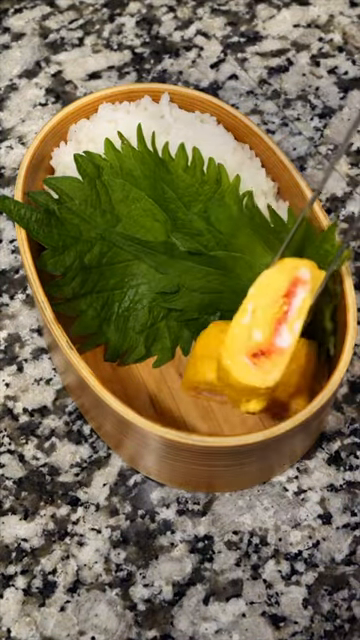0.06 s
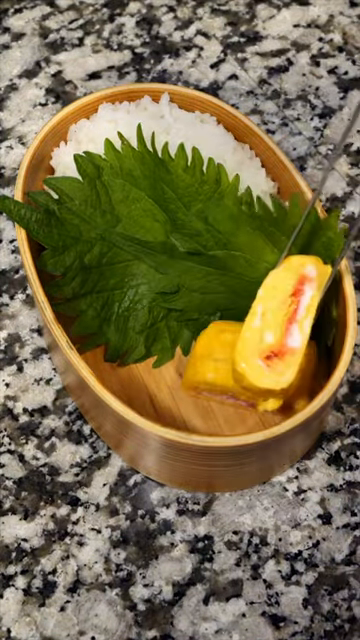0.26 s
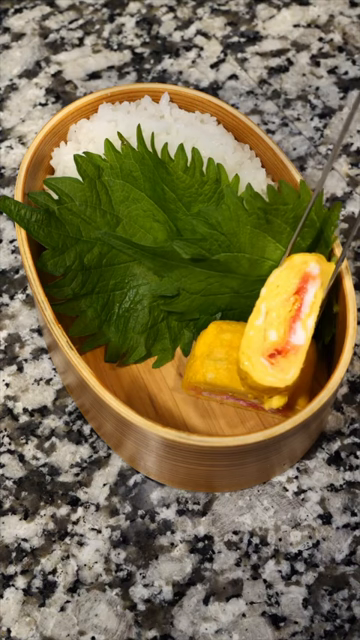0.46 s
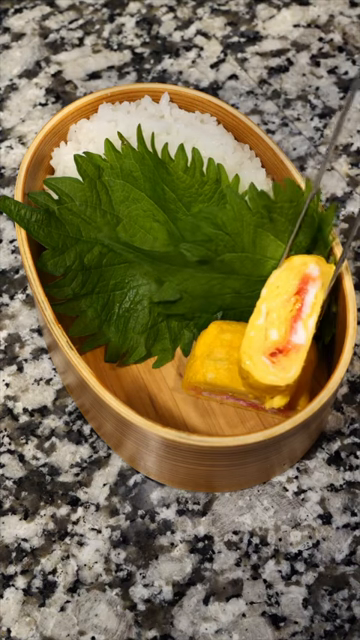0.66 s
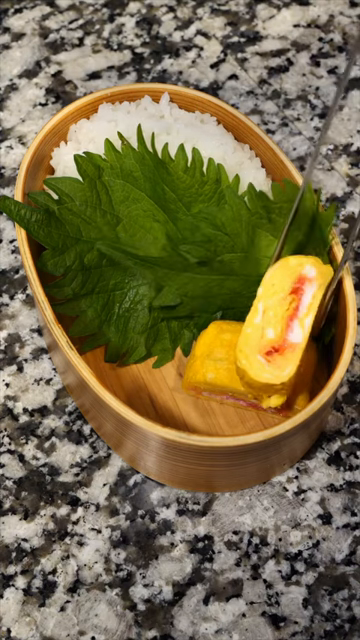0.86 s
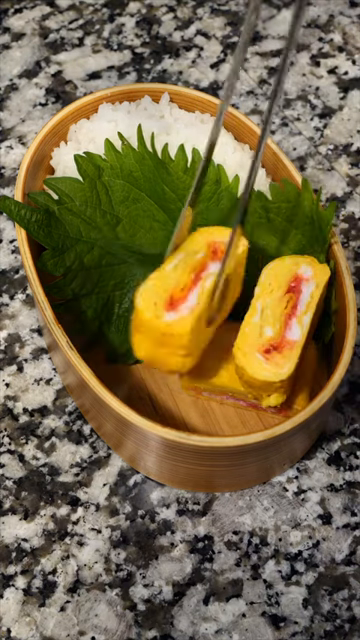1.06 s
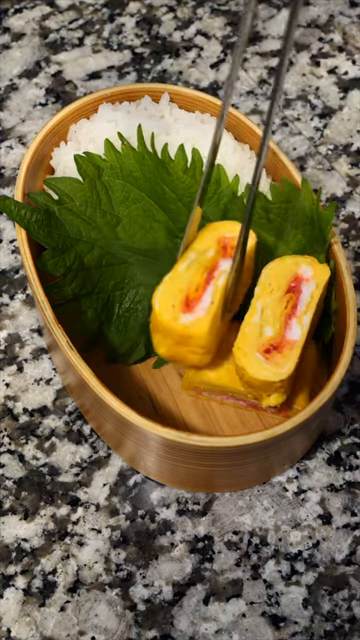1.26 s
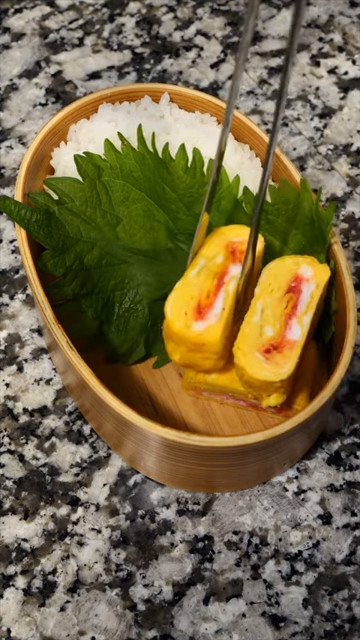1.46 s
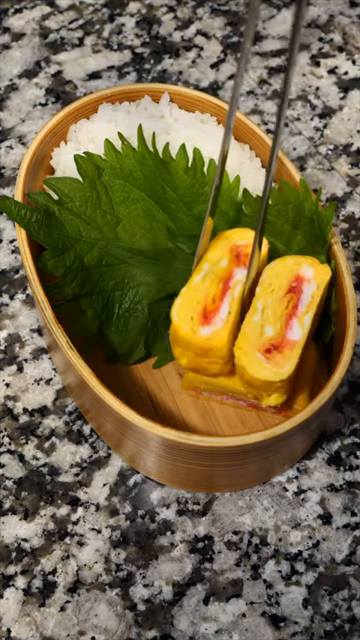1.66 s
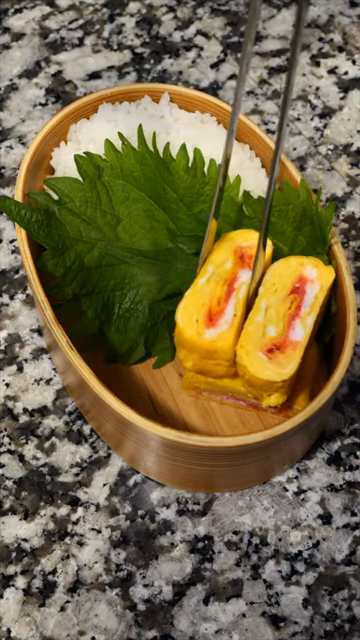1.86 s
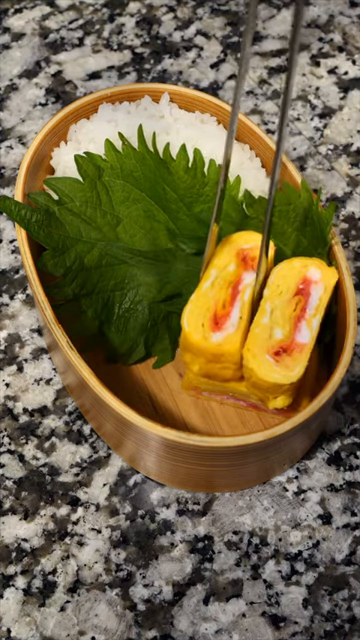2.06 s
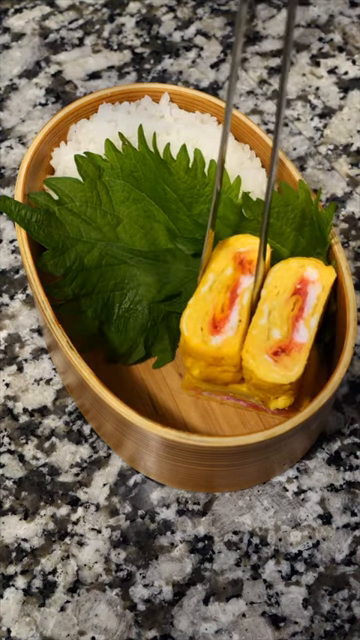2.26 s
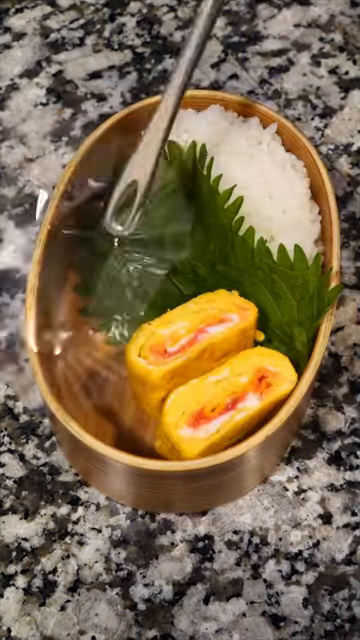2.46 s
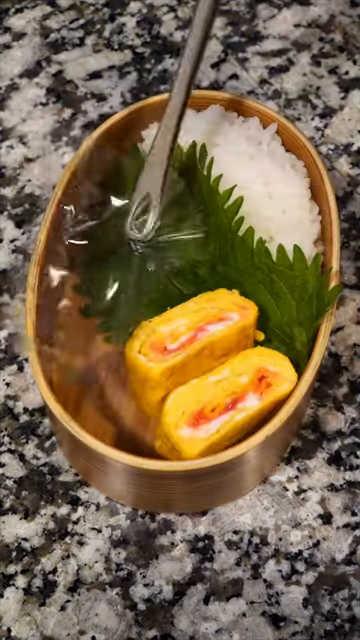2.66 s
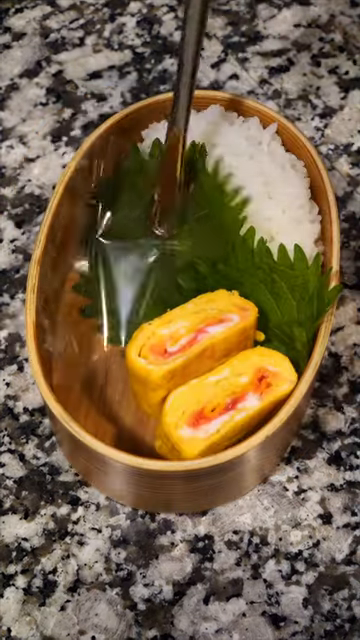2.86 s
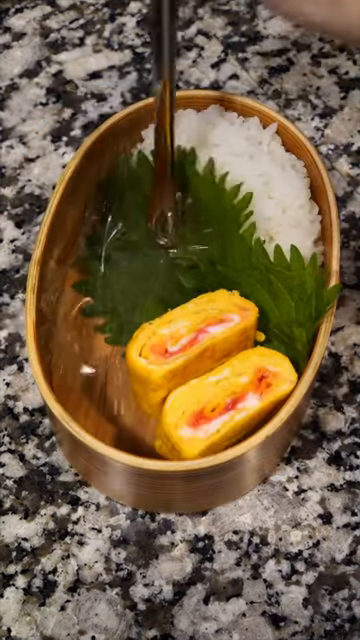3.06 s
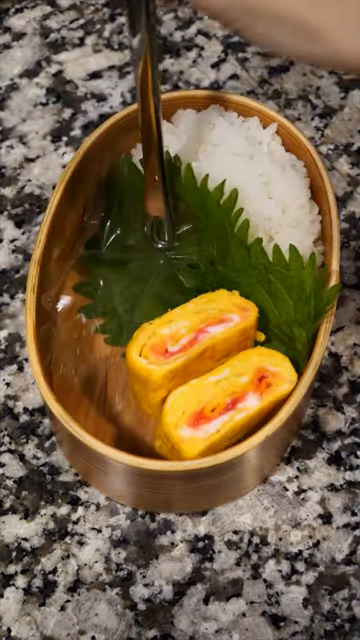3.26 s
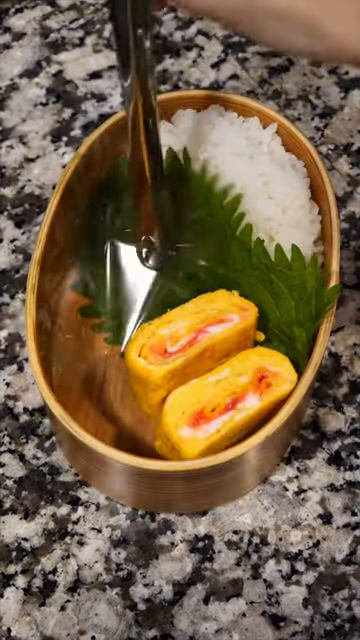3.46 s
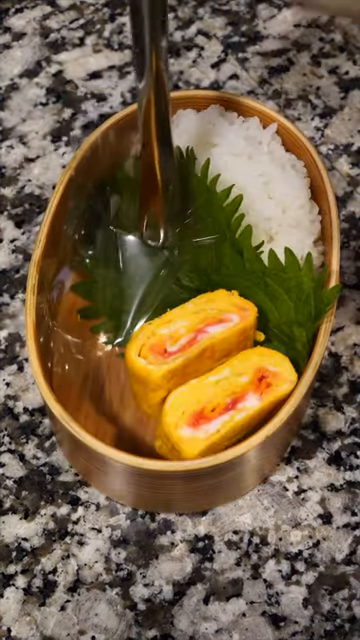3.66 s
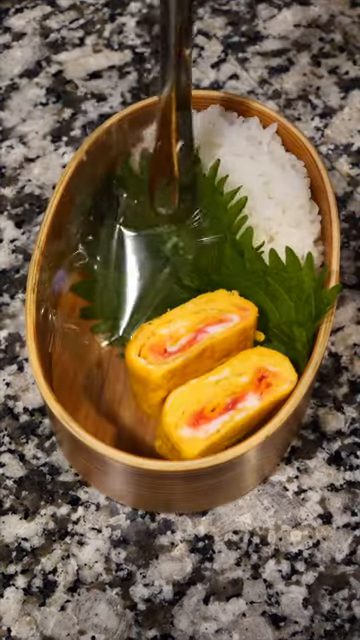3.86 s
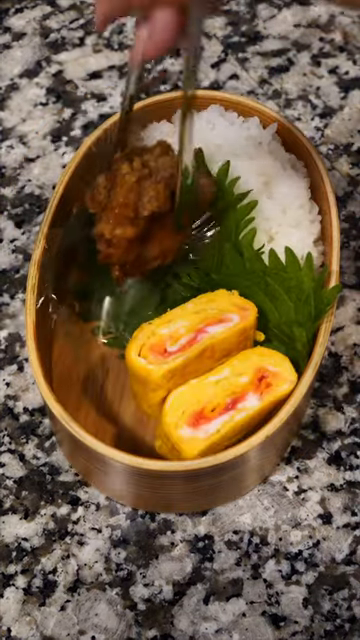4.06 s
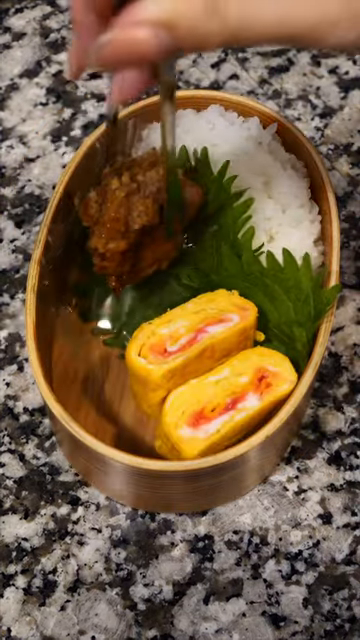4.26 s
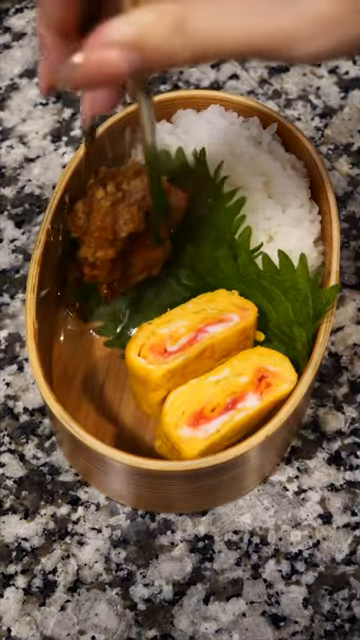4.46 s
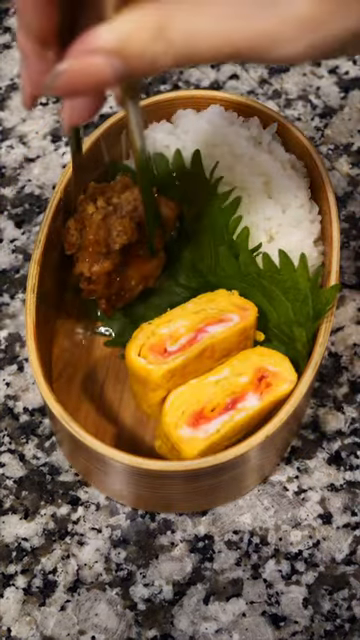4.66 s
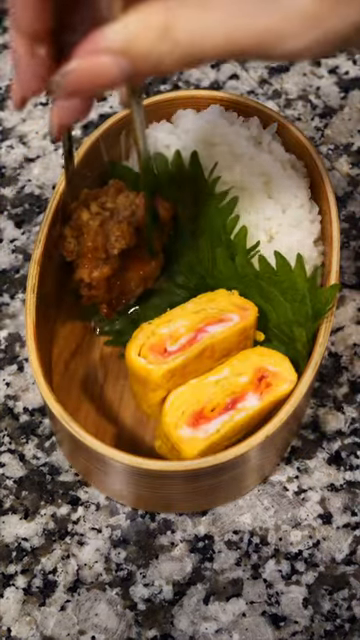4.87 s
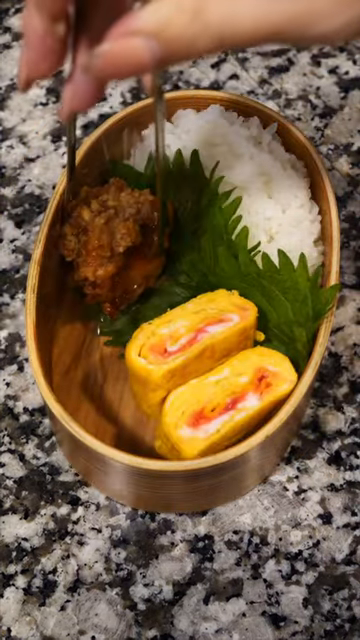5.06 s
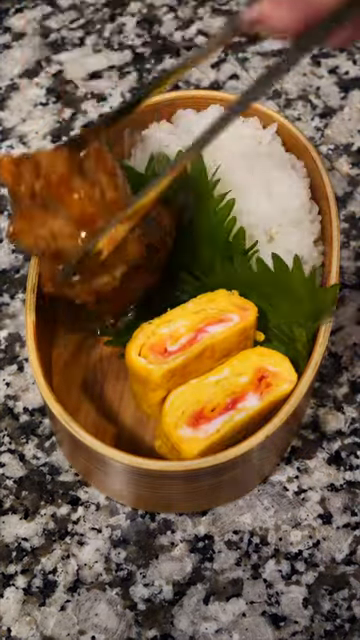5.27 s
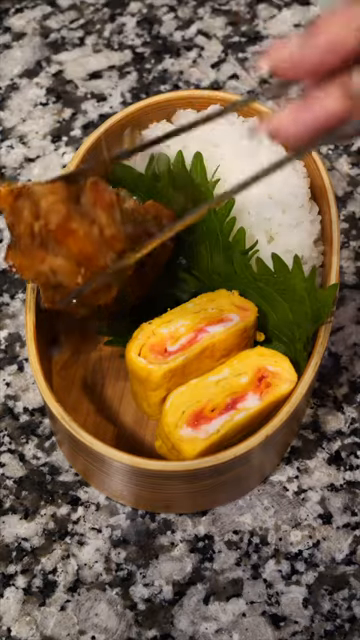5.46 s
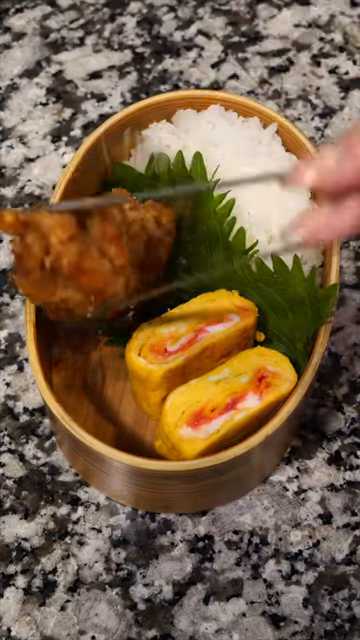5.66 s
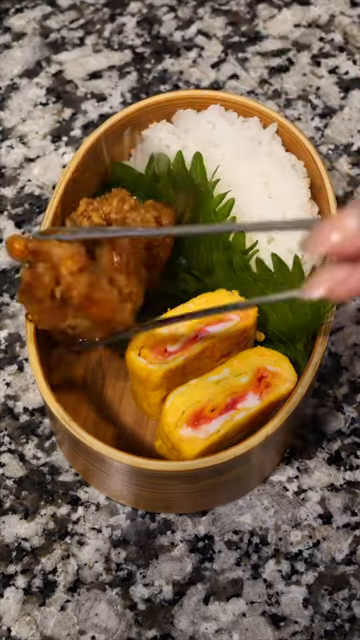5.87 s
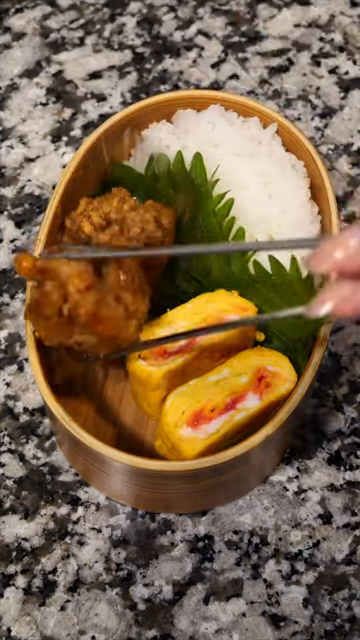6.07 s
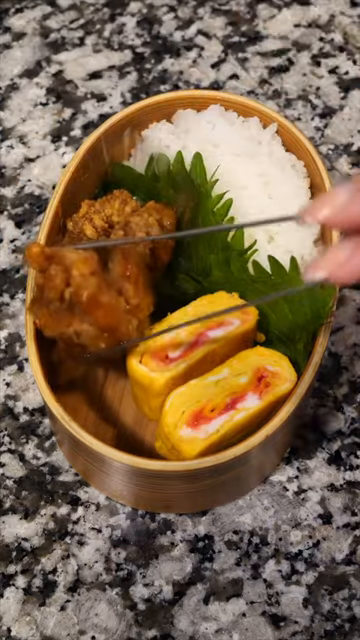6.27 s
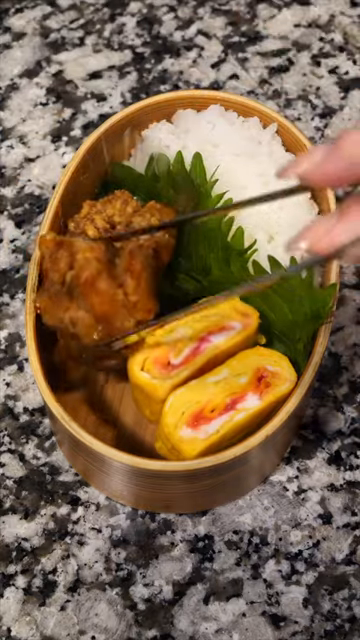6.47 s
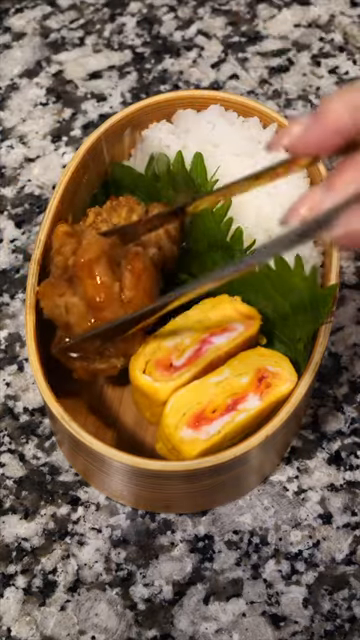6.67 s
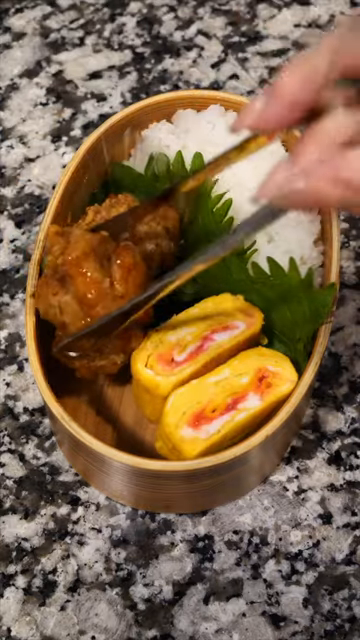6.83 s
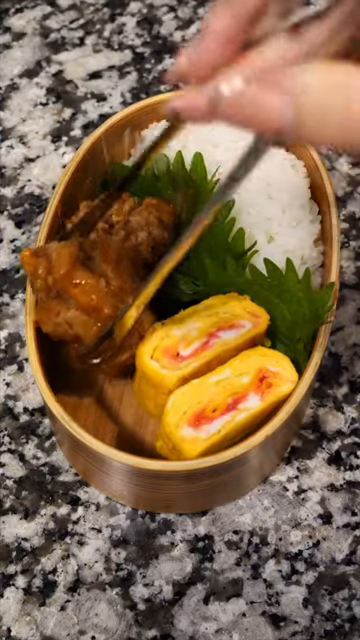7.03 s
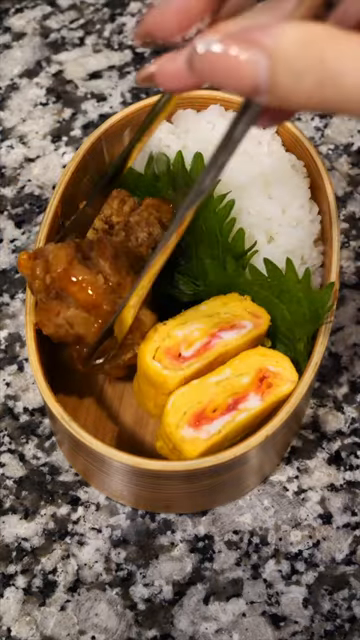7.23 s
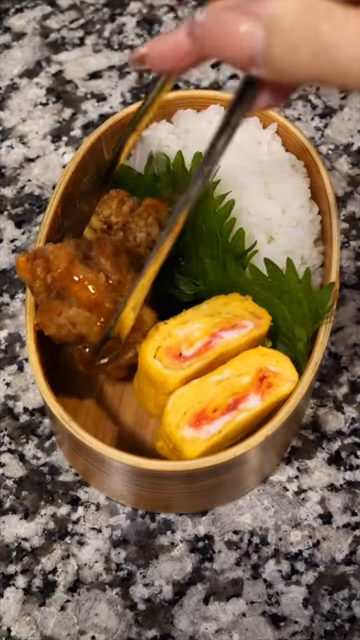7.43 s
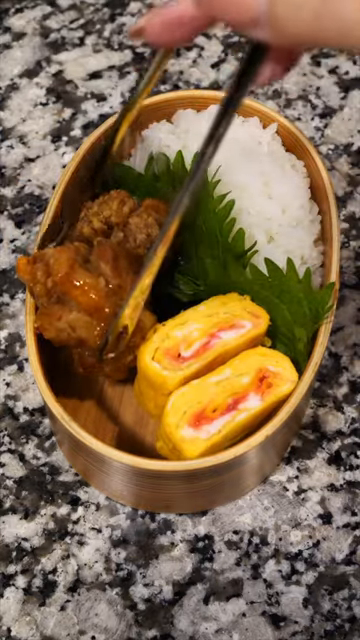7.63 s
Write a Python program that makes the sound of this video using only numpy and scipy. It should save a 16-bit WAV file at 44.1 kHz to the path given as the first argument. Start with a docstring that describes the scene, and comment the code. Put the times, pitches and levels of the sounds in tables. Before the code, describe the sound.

Thin stiff plastic snaps and crackles sharply inside a wooden lunch box, then light metal tong taps, over faint room air and appliance hum.

```python
"""Room air (shaped noise) and an appliance's hum (noise through narrow resonances) run throughout.
From 0.9 s a stiff, thin plastic cup snaps softly in a wooden lunch box: delayed pulses through resonances.
From 2.6 s it is squeezed: hard snaps, crackle made of random ticks, and dying sine pings of its panels.
The box floor rings low under it from the start, the wall is knocked at 4.8 s and slim tongs tap at 5.1 s.
A cut leaves only air and hum from 5.3 to 6 s; snaps and taps return until 7.1 s, in a small hard kitchen."""
import sys
import numpy as np
from scipy import signal
from scipy.fft import irfft
from scipy.io import wavfile
from scipy.ndimage import uniform_filter1d

SR = 44100
rng = np.random.default_rng(int(sys.argv[2]) if len(sys.argv) > 2 else 0)


def to_wav(s):
    """Save 16-bit WAV."""
    ch = np.atleast_2d(s).T  # columns
    pcm = np.round(np.clip(ch, -1, 1) * 32767)  # PCM
    wavfile.write(sys.argv[1], SR, pcm.astype(np.int16))


N = 339570


def gain_of(db):
    """Decibels to gain."""
    return 10 ** (np.asarray(db) / 20)


def evened(x):
    """Scales to rms 1."""
    return x / np.sqrt(np.mean(x ** 2) + 1e-20)


def read(points, hz):
    """Reads a table over log frequency."""
    f, value = np.transpose(points)
    return np.interp(np.log(hz + 1), np.log(f + 1), value)


def add(mix, s, sound):
    """Mixes a sound in at a time in seconds."""
    part = mix[round(s * SR):][:len(sound)]
    part += sound[:len(part)]


def noise_pair(shape, side_db, size):
    """Left and right from random short-time spectra: a shared middle plus an unrelated, weaker side."""
    a, b, c, d = rng.standard_normal((shape.shape[1], shape.shape[0], 4)).T
    hz = np.fft.rfftfreq(size, 1 / SR)
    mid = a + 1j * b
    side = gain_of(read(side_db, hz))[:, None] * (c + 1j * d)
    spectra = np.array([mid + side, mid - side]) * shape
    return signal.istft(spectra, nperseg=size, noverlap=size * 3 // 4)[1]


def air():
    """Steady noise of the room, with faint drifting patches in its spectrum."""
    # colour of the air: (frequency [Hz], relative level per Hz [dB])
    air_colour = [(25, -59.5), (65, -38), (102, -11.5), (251, -3.5), (357, -4), (387, -9), (420, -7),
                  (722, -9), (922, -17), (1500, -16), (1820, -22), (2600, -28), (9500, -34.5),
                  (15100, -42.5), (16400, -52)]
    # stereo width: (frequency [Hz], side against mid [dB])
    air_width = [(60, -39.5), (150, -58), (380, -22.5), (950, -9.5), (2380, -4.5), (5980, -12.5),
                 (15000, -37)]
    level_db = -49
    hz = np.fft.rfftfreq(2048, 1 / SR)
    patches = rng.standard_normal((N // 512 + 5, len(hz))).T
    patches = uniform_filter1d(patches, 20, 0)  # smooth over frequency
    patches = evened(uniform_filter1d(patches, 8, 1))  # and over time
    shape = gain_of(read(air_colour, hz)[:, None] + 0.66 * patches)
    noise = noise_pair(shape, air_width, size=2048)[:, :N]
    return gain_of(level_db) * evened(noise)


def resonate(x, hz, width):
    """A resonance of gain 1, applied twice for steep skirts."""
    pole = np.exp((2j * np.pi * min(hz, SR * .45) - np.pi * width) / SR)
    rung = 2 * signal.lfilter([(1 - abs(pole)) ** 2], [1, -2 * pole, pole ** 2], x).real
    # a small object sends out little bass
    return np.diff(rung, prepend=0) / abs(2 * np.sin(np.angle(pole) / 2))


def hum():
    """Fuzzy tones of a running appliance: noise through resonances."""
    # hum tones: (frequency [Hz], width [Hz], level [dB])
    hum_tones = [(262, 13, -57.5), (390.7, 16, -57.5), (590.3, 13, -60), (1111, 82, -65.5)]
    out = np.zeros(N)
    for hz, width, db in hum_tones:
        out += gain_of(db) * evened(resonate(rng.standard_normal(N), hz, width))
    return out


def through_cup(x, shares_db, tuning):
    """Sum of the cup's resonances, neighbours in opposite phase."""
    # broad resonances of cup and box, low to high: (frequency before tuning [Hz], width [Hz], relative level [dB])
    cup_modes = [(1076, 1230, 17), (1750, 1800, 18), (2510, 1950, 13.5), (4680, 2500, 13), (8000, 4750, 3),
                 (14200, 1500, 7)]
    out = 0
    for k, ((hz, width, db), share) in enumerate(zip(cup_modes, shares_db)):
        out = out + (-1) ** k * gain_of(db + share) * resonate(x, hz * tuning, width)
    return out


def snaps():
    """A crease flips; bending waves bring each pitch to the air at its own delay. Gives direct and room feed."""
    # snaps: (time [s], strength [dB], body [dB], crack [dB], sizzle [dB], tuning of the bent cup [factor],
    # relative spread [ms]); body sets the three low resonances, crack the fourth, sizzle the highest,
    # all against the fifth
    snap_events = [(0.8859, -28.5, 5.5, 0.5, 0, 0.9, 0.6), (1.057, -39, 0, -8, 4, 0.85, 1.7),
                   (1.267, -34.5, -1, -11, -15, 0.81, 2.8), (1.6347, -33, -13, -20, -15, 1.05, .8),
                   (2.5552, -6.5, 1.5, -1.5, -11, 0.63, 0.64), (2.5837, -20, -1, -11, -17, 0.99, 1.1),
                   (2.637, 3.5, -12, -15, -27, 0.89, 0.55), (2.662, -28.5, 8, 2, -22, 0.76, 1.8),
                   (2.7366, -17, -2, -15, -9, 0.72, 2.7), (2.762, -10.5, -6, -27, 2.5, 0.81, 1.46),
                   (2.773, -10.5, 2.5, -1.5, -8, 1.05, 1.4), (2.79, -11, 0.5, -8.5, -9, 0.98, 0.66),
                   (2.832, -27, 8.5, 6.5, -20, 1.22, 3.3), (3.1661, 10, -16, -11.5, -10.5, 0.91, 0.32),
                   (3.3493, 0, -13.5, -17.5, -26.5, 1.09, 0.73), (3.409, -13, -9.5, -14, -20, 0.74, 1.34),
                   (3.4133, -14.5, -7, -14, -6.5, 1, 0.86), (3.421, -7.5, -5, -9.5, -1, 0.67, 1.16),
                   (3.4244, 9, -13.5, -4.5, -2.5, 1.24, 1.08), (3.5442, -24.5, -1.5, -11.5, -22, 1, 1.03),
                   (3.6732, 9, -9.5, -4, -12, 1.15, 1.6), (4.1102, -32.5, 2, -3, -16, 1.02, 1.66),
                   (4.156, -30.5, 1, -7, -8, 0.94, 1.1), (4.2411, -12.5, -10, -12, -9, 0.99, 2.04),
                   (4.26, 4.5, -12, -14.5, -17, 0.93, 0.76), (4.333, -28, -1, -8, -8, 1.04, 0.96),
                   (4.4175, -3, -7, -10.5, -12.5, 0.87, 0.89), (4.446, -23, -8, -10.5, -16.5, 0.59, 0.77),
                   (4.455, -16, -4, -5, -8, 0.79, 0.4), (4.469, 1.5, -14.5, -15, -37.5, 0.89, 0.59),
                   (4.511, -14.5, -18, -13, -18, 0.93, 0.31), (4.5573, -30.5, 0.5, -15, -21, 0.89, 0.25),
                   (4.577, -22, -19, 0, -6, 1, 0.3), (4.585, -22.5, -14, -1, -8, 1.24, 0.56),
                   (4.6077, -35, 7, -7, -12, 0.77, 0.76), (4.626, -14, -5, -1, -13, 0.99, 0.76),
                   (4.721, -4, -4, -5.5, -11, 0.91, 1.27), (4.7352, -14.5, -5, 1, 8.5, 0.66, 0.83),
                   (4.7538, 9, -12, -10.5, -1, 0.94, 1.51), (4.812, -11, -10, -0.5, -10, 1.2, 0.51),
                   (4.938, -18, -10.5, -16, -24, 0.93, 0.78), (4.9642, -34, 4, 3, -9, 0.77, 0.81),
                   (5.0817, -9.5, -12.5, -7.5, -9, 1.15, 0.52), (5.1173, -15.5, -11, -9, -14, 0.84, 0.56),
                   (5.2897, -24.5, -1, -6, 0.5, 0.7, 0.69), (5.3002, -35.5, 9, -15, -12, 0.61, 0.63),
                   (6.0855, -12, -6, -6.5, -29, 0.99, 0.85), (6.245, -25.5, -9, -13, -13.5, 0.92, 1.4),
                   (6.437, -39.5, 7, 14.5, 7, 0.83, 0.57), (6.464, 3, -12.5, -24, -16, 1, 0.56),
                   (6.6362, -12, -8, -7.5, -34, 0.94, 0.44), (6.774, -9.5, -13, -17, -9, 1.2, 1.2),
                   (6.7796, -7.5, -16, -18, 6, 0.87, 0.6), (6.82, -4.5, -14.5, -19, -21, 0.77, 0.53),
                   (7.009, -26.5, -4, -2.5, -21, 1.43, 0.83), (7.0523, -24.5, 0.5, -3, 3, 0.7, 0.99),
                   (7.0844, -9.5, -12.5, -7.5, -13, 1.06, 0.86)]
    # how the three low resonances follow the body: (level at body 0 [dB], slope [dB per dB of body])
    body_follow = [(-2.5, 1.3536), (1.5, 1.4333), (5.5, 1.2847)]
    # tight snaps face the microphone, spread ones reach it more by the room
    room_db, room_db_per_ms = -5, 3.5
    direct, thrown = np.zeros(N), np.zeros(N)

    chance = rng.standard_normal((len(snap_events), 513))
    chance = uniform_filter1d(chance, size=30, axis=1)  # smooth over frequency
    spread_s = np.array(snap_events)[:, -1:].clip(0, 4) / 1000
    delays_s = 0.000308 + spread_s * 0.7 * evened(chance) ** 2
    ripple = gain_of(2.1 * evened(chance[:, ::-1]))  # no two creases have quite the same colour
    phase = 2 * np.pi * np.cumsum(delays_s, axis=1) * SR / 1024  # delays summed over frequency
    pulses = irfft(ripple * np.exp(-1j * phase), axis=1)[:, :700]

    for (s, db, body_db, crack_db, sizzle_db, tuning, ms), pulse in zip(snap_events, pulses):
        low_db = [rest_db + slope * body_db for rest_db, slope in body_follow]
        shares_db = low_db + [crack_db, 0, sizzle_db]
        snap = gain_of(db) * through_cup(pulse, shares_db, tuning)
        # a weaker repeat about 1 to 2 ms later, gap drawn at random, combs the colour
        gap = round(SR / rng.uniform(500, 1100))
        add(direct, s, snap + 0.35 * np.roll(snap, gap))
        add(thrown, s, gain_of(room_db + room_db_per_ms * min(ms, 2)) * snap)
    return direct, thrown


def rings(blows, modes):
    """A blow sets close modes ringing; they beat against each other as they die."""
    free_db, free_octaves = 7, 0.25  # how much, and how widely, modes near a free pitch stand out
    out, t = np.zeros(N), np.arange(SR // 4) / SR
    phases = 2 * np.pi * rng.random((len(blows), len(modes)))
    for (s, db, *free_hz), phase in zip(blows, phases):
        ring = np.zeros(len(t))
        for (hz, mode_db, t60), p in zip(modes, phase):
            lift_db = sum(free_db * np.exp(-(np.log2(hz / f) / free_octaves) ** 2) for f in free_hz)
            dying = gain_of(mode_db + lift_db - 60 * t / t60)
            ring += dying * np.sin(2 * np.pi * hz * t + p)
        add(out, s, gain_of(db) * ring * np.minimum(t / 0.00067, 1))  # short rise in s
    return out


def floor_pushes():
    """The cup is pushed against the box floor, which rings low."""
    # pushes: (time [s], level [dB])
    push_events = [(0.887, -45), (2.557, -29.5), (2.775, -29.5), (2.79, -28), (2.835, -33.5),
                   (3.167, -43.5), (4.261, -36.5), (4.722, -35), (6.087, -43.5), (6.466, -40.5)]
    # floor modes: (frequency [Hz], relative level [dB], time to die by 60 dB [s])
    floor_modes = [(686, -16, .05), (853, -2, 0.045), (987, -6.5, 0.061), (1290, -0.5, 0.076),
                   (2205, -6.5, 0.04)]
    return rings(push_events, floor_modes)


def pings():
    """A flat panel of the cup rings for a few cycles at its own pitch."""
    # pings: (time [s], level [dB], pitch [Hz])
    ping_events = [(0.887, -40, 2050), (2.9322, -17.5, 1900), (3.1663, -3.5, 7800), (3.1663, -16, 2000),
                   (3.3502, -9, 7820), (3.4239, -5, 8200), (3.428, -6.5, 2750), (3.6735, -13, 2050),
                   (3.674, -2, 10400), (3.676, -12, 7000), (4.385, -24, 2300), (4.4695, -6.5, 7600),
                   (4.7553, -2.5, 4500)]
    cycles = 20  # until it has died by 60 dB
    out, t = np.zeros(N), np.arange(1000) / SR
    for s, db, hz in ping_events:
        dying = gain_of(db - 60 * t * hz / cycles)
        rise = np.minimum(t * hz / 1.2, 1)  # over 1.2 cycles
        add(out, s, dying * np.sin(2 * np.pi * hz * t) * rise)
    return out


def crumple():
    """Many small creases of uneven size give way at random; in a burst a fold slides over at once."""
    # crackle while the cup is bent, one curve per squeeze: (time [s], level [dB], brightness [dB])
    squeeze_curves = [
        [(2.66, -43, -29), (2.71, -57, -3), (2.768, -37.5, 1), (2.776, -41, 4), (2.82, -49, -13),
         (2.9, -40.5, -6), (3.14, -50.5, -3.5)],
        [(3.22, -66, -6.5), (3.312, -49.5, -5.5), (3.34, -59, -2)],
        [(3.5, -53, -7), (3.554, -40, -3), (3.61, -57, -3), (3.66, -45, 3)],
        [(4.3, -70.5, -2), (4.376, -70, 10), (4.382, -45, -7.5), (4.48, -59, -4), (4.566, -74.5, -3),
         (4.766, -45, 8.5), (4.86, -66, 6)],
        [(5.09, -69, 7.5), (5.17, -80, -5), (5.3, -57, -22)],
    ]
    # bursts: (time [s], level [dB], brightness [dB], length [ms])
    fold_bursts = [(2.921, -34, -3.5, 44), (4.381, -35.5, -7.5, 14.3), (4.604, -34, -1, 17),
                   (4.682, -33, -3, 24), (5.068, -35.5, -22, 14), (.9, -64, -9.5, 150)]
    t = np.arange(N) / SR
    sizes = gain_of(3.8 * np.minimum(rng.exponential(1, N), 3.5))
    happens = rng.random(N) < 450 / SR  # 450 ticks a second on average
    ticks = sizes * happens * rng.choice([-1, 1], N)
    dull = evened(through_cup(ticks, (-7.5, -1.0, 4, -11.5, -35.5, -28.0), 0.78))
    bright = evened(through_cup(ticks, (-28.5, -37.0, -23.5, -5.0, 1.5, -12.5), 1.0))
    out = np.zeros(N)
    for rows in squeeze_curves:
        s, db, bright_db = np.transpose(rows)
        on = uniform_filter1d(1. * (t > s[0]) * (t < s[-1]), 400)  # soft edges
        colour = dull + gain_of(np.interp(t, s, bright_db)) * bright
        out += on * gain_of(np.interp(t, s, db)) * colour
    for s, db, bright_db, ms in fold_bursts:
        u = np.clip((t - s) * 1000 / ms, 0, 1)
        swell = np.sin(np.pi * u ** .85).clip(0)
        out += gain_of(db) * swell * (dull + gain_of(bright_db) * bright)
    return out


def wall_knocks():
    """The box wall is knocked and rings."""
    # knocks: (time [s], level [dB])
    knock_events = [(4.812, -20), (4.821, -33)]
    # wall modes: (frequency [Hz], relative level [dB], time to die by 60 dB [s])
    wall_modes = [(1573, -4, 0.048), (1480, -3, 0.027)]
    return rings(knock_events, wall_modes)


def tong_taps():
    """The tongs tap the rim and ring, modes near the pitch that the grip leaves most free standing out."""
    # taps: (time [s], level [dB], free pitch [Hz])
    tap_events = [(5.1176, -35, 4700), (6.0876, -41.5, 6700), (6.2448, -48.5, 3700), (6.4641, -23.5, 3500),
                  (6.636, -42, 4200), (6.8206, -47, 5600), (7.0855, -29.5, 1660)]
    # tong modes: (frequency [Hz], relative level [dB], time to die by 60 dB [s])
    tong_modes = [(1265, -4, .022), (1540, -5, .025), (1850, -6, .018), (3050, -12, .018), (3595, -6, .022),
                  (3960, -6, .025), (4440, -10, .018), (4950, -10, .015), (5460, -7, .018),
                  (6040, -8, .025), (7700, -6, .012)]
    return rings(tap_events, tong_modes)


def hollowed(x):
    """Sound from inside the open box, whose hollow cancels part of a band."""
    hollow_hz, width_hz, depth = 3290, 490, 0.2
    band = signal.lfilter(*signal.iirpeak(hollow_hz, hollow_hz / width_hz, SR), x)
    return x - depth * band


def bounced(x):
    """The direct sound with its first bounces off the box floor and rim, heard a little apart."""
    # bounces: (delay [ms], left level [dB], right level [dB])
    box_bounces = [(.11, -12, -28), (.5, -28, -13)]
    taps = np.zeros((2, 64))
    taps[:, 0] = 1
    for ms, *db in box_bounces:
        taps[:, min(round(ms * SR / 1000), 63)] += gain_of(db)
    return signal.oaconvolve(x[None], taps, axes=1)[:, :N]


def kitchen(x):
    """Near surfaces answer first; a diffuse tail follows, its pattern turning steadily among three random tails."""
    # echoes off the box, then the counter: (delay [ms], relative level [dB])
    near_echoes = [(3.6, -11), (5.5, -12)]
    # tail: (frequency [Hz], time to die by 60 dB [s], relative level [dB])
    tail_decay = [(506, 0.24, 10.5), (1355, 0.31, -1), (3495, 0.3, 0.5), (9540, 0.23, 0), (11020, 0.22, -4),
                  (16150, 0.19, -1.5)]
    # stereo width of the tail: (frequency [Hz], side against mid [dB])
    tail_width = [(250, -33.5), (1000, -11.5), (2400, -13.5), (4500, -30), (8000, -75), (13000, -5.5)]
    kitchen_db = 3  # raises echoes and tail alike
    early = np.zeros(2000)
    for ms, db in near_echoes:
        early[round(ms * SR / 1000)] = gain_of(kitchen_db + db)
    early = signal.lfilter(*signal.butter(2, 10500, fs=SR), early)  # food and hands swallow the top
    out = np.tile(signal.oaconvolve(x, early)[:N], (2, 1))

    hz, t = np.fft.rfftfreq(256, 1 / SR), np.arange(400) * 64 / SR
    decay = np.array(tail_decay)
    t60 = read(decay[:, [0, 1]], hz)[:, None]
    db = read(decay[:, [0, 2]], hz)[:, None]
    dying = gain_of(db - 60 * t / t60)
    turn = 2 * np.pi * 1.3 * np.arange(N) / SR  # 1.3 turns a second
    for k in range(3):
        tail = noise_pair(dying, tail_width, size=256)
        tail = tail * np.minimum(np.arange(tail.shape[1]) / SR / 0.001, 1)  # density builds up
        tail = tail / np.linalg.norm(tail[0])
        feed = x * np.sqrt(2 / 3) * np.cos(turn + k * np.pi / 3)
        out += gain_of(kitchen_db) * signal.fftconvolve(feed[None], tail, axes=1)[:, :N]
    return out


def scene():
    """Cup, box and tongs close by and centred, in the kitchen, over air and hum."""
    cut_start_s, cut_end_s = 5.305, 6.0  # a cut stops cup, box, tongs and tails here; air and hum run on
    direct, thrown = snaps()
    crackle, ping = crumple(), pings()
    rung = wall_knocks() + tong_taps() + floor_pushes()
    close = bounced(hollowed(direct + crackle + rung + ping))
    room_feed = thrown + gain_of(-6) * crackle + rung + gain_of(-8) * ping
    room = kitchen(hollowed(room_feed))
    t = np.arange(N) / SR
    heard = 1 - (t > cut_start_s) * (t < cut_end_s)
    return heard * (close + room) + air() + hum()


def record(dry):
    """The microphone softens the top; full scale is a hard ceiling; deep bass is cut; then the band limit."""
    soft = signal.lfilter(*signal.butter(1, 15000, fs=SR), dry)
    full = np.clip(soft, -1, 1)
    thin = signal.sosfilt(signal.butter(1, 40, "highpass", fs=SR, output="sos"), full)
    edge = signal.firwin(511, 16400, window=("kaiser", 12), fs=SR)  # steep low-pass in Hz
    return 0.92 * signal.oaconvolve(thin, edge[None], "same")


dry = scene()
out = record(dry)
to_wav(out)
```